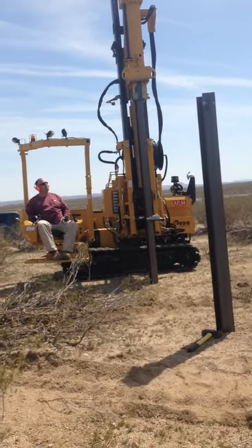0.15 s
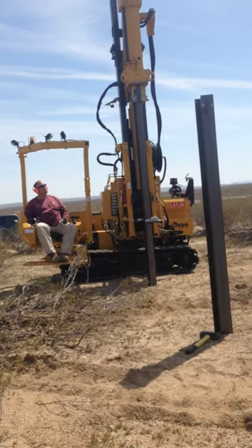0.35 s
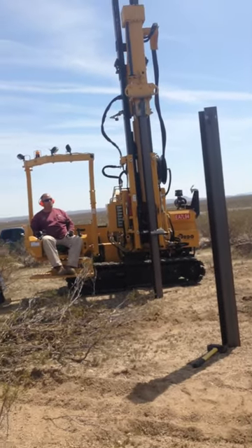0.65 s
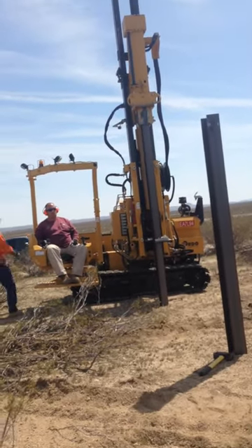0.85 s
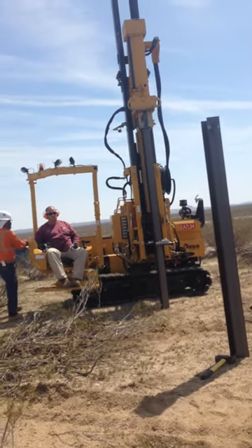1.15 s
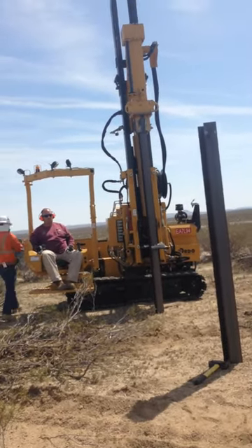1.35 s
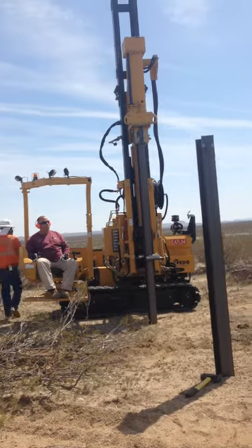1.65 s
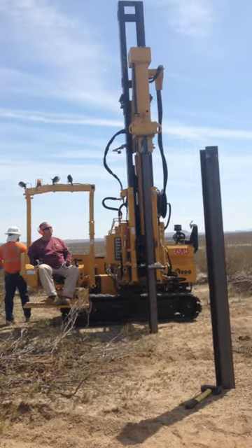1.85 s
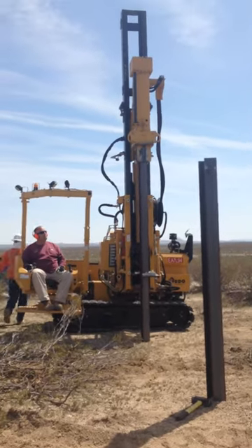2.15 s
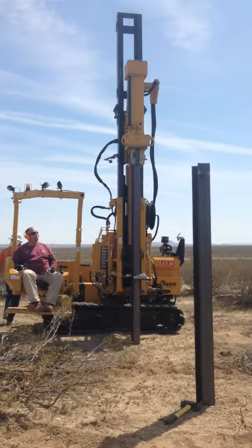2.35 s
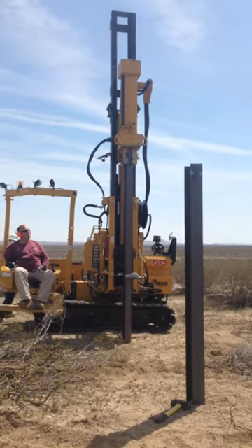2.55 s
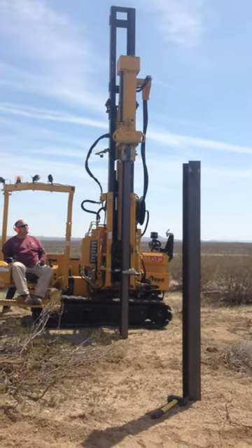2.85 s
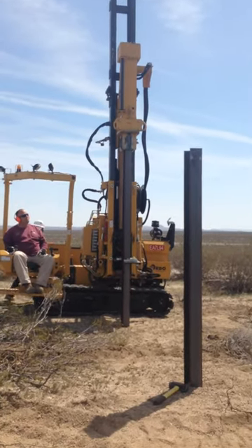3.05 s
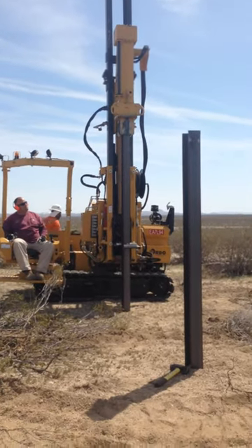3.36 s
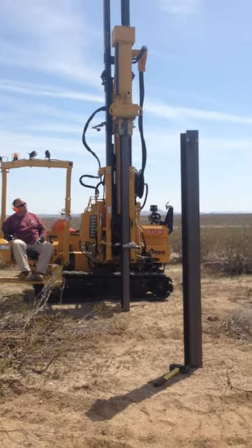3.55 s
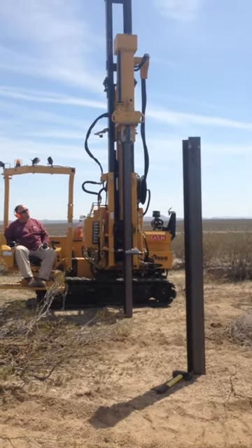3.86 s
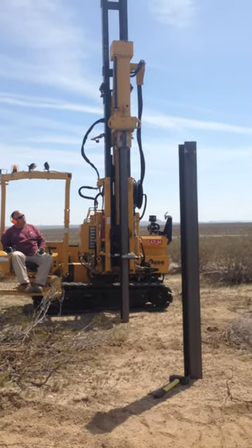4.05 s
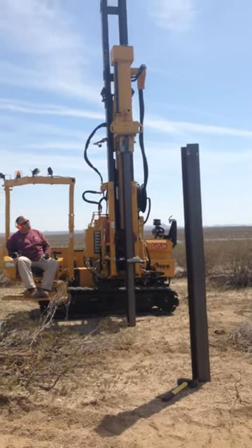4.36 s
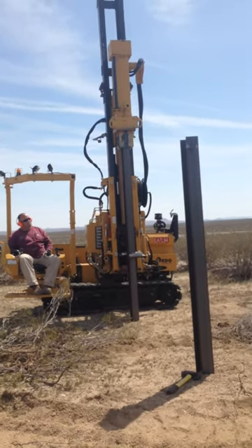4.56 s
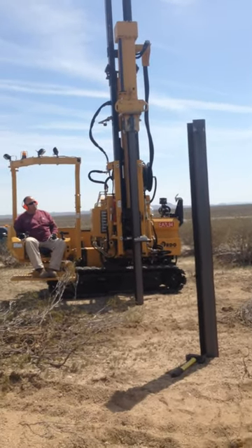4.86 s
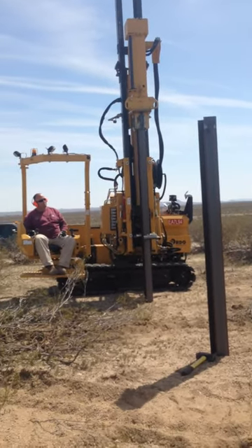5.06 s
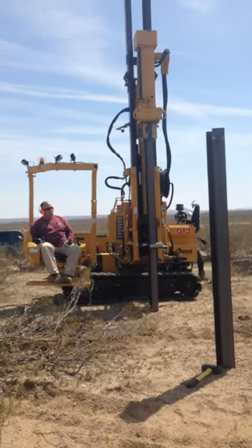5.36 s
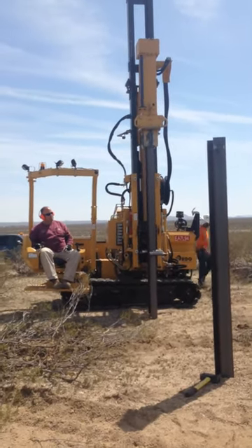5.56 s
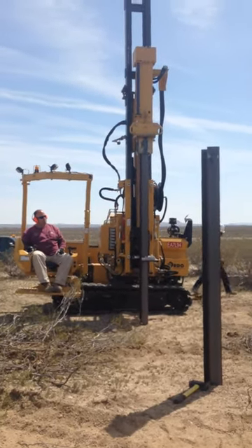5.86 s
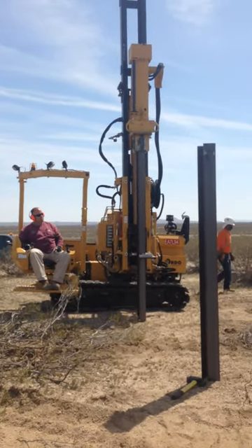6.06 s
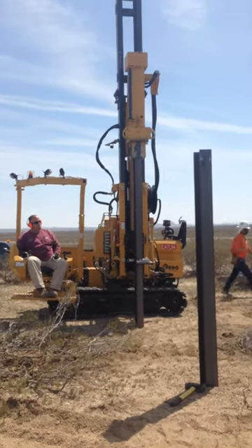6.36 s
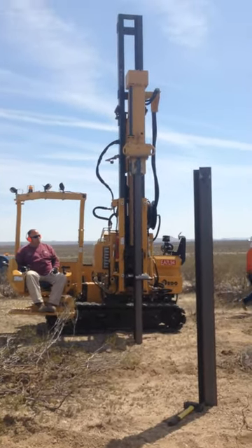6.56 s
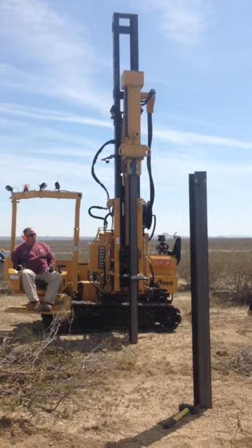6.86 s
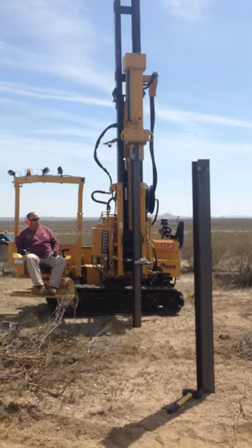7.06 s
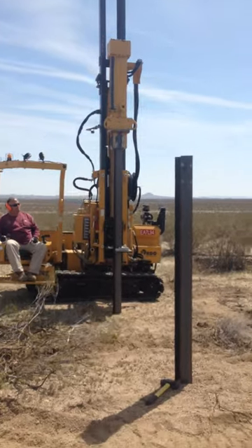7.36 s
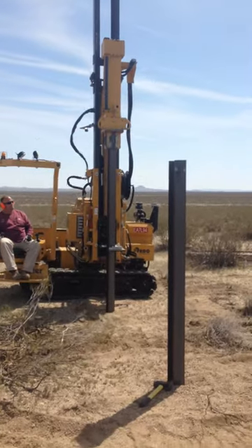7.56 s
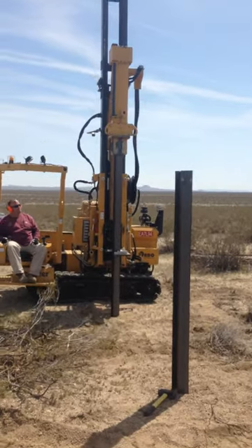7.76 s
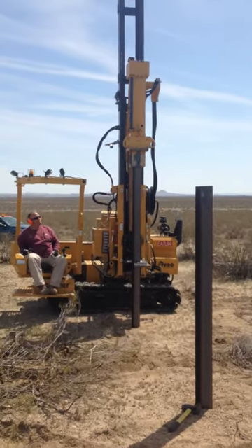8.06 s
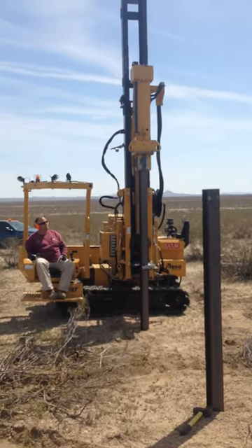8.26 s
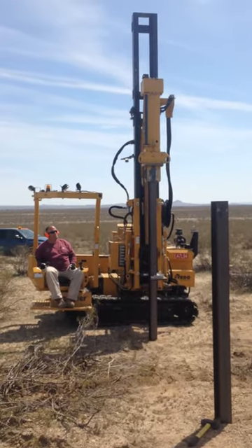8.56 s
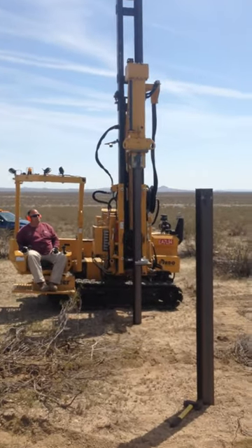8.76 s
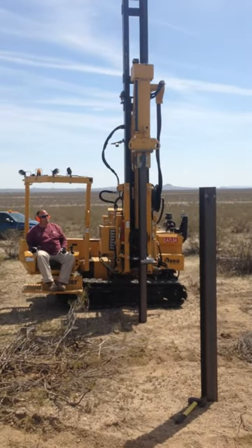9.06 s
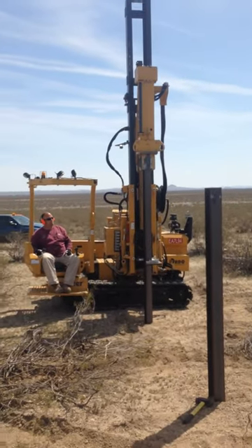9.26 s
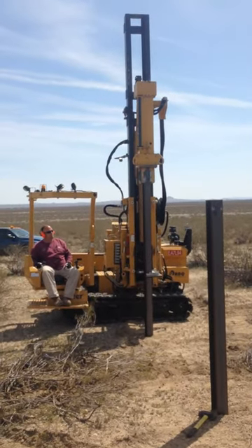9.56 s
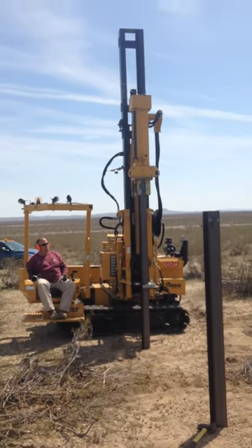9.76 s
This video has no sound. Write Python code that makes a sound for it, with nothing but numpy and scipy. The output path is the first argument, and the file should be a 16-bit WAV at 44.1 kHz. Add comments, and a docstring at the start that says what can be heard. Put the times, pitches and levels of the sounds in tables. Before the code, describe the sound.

Already running at 0 s, a hydraulic hammer pounds a steel pile at roughly sixteen blows a second, unbroken to the end near 10 s. Each blow is a short dense clank with a quick rebound rattle and thin high overtones. A piercing ring near 2.8 kHz never stops, swelling between blows and wavering. Below, a diesel hums and rushes, rising with the hammering. Faint sharp ticks occur around 0.4-0.6 s, and the ring is abruptly checked several times from 0.7 to 1.7 s. From about 2 to 4.5 s the clank is stronger; further checks follow from 4 s, and blows ease towards 6.5 s. Around 7.1-7.9 s the pile meets firmer ground: its knock changes pitch, the treble dulls, and the mast clonks irregularly until 9.5 s. The ring weakens near 9 s, with one faint tick at 9.2 s, then returns. Close, dry, open-air sound with limited peaks.

```python
"""Open ground, dry, microphone a few metres from a hydraulic hammer driving a steel pile, some sixteen blows a second.
From the start a diesel hums and rushes below, each blow clanks in dense modes, and a flange sings near 2.8 kHz.
Small ticks and checked rings mark the first two seconds; more checks follow from four seconds on.
Past seven seconds the foot breaks into firm ground: the pile's modes change, the treble dulls and jolts clonk
the mast, with one late tick near nine seconds. A limiter ducks the peaks throughout."""
import sys
import numpy as np
from scipy import signal
from scipy.fft import rfft, irfft
from scipy.io import wavfile
from scipy.ndimage import uniform_filter1d, minimum_filter1d

SR = 44100
rng = np.random.default_rng(int(sys.argv[2]) if len(sys.argv) > 2 else 0)


def int16_out(signal):
    """Quantize to a 16-bit WAV file."""
    q = np.round(np.clip(np.atleast_2d(signal).T, -1, 1) * 32767)
    wavfile.write(sys.argv[1], SR, q.astype(np.int16))


N = 436581
TIME = np.arange(N) / SR
AGE = np.arange(8192) / SR  # seconds since a blow

# How hard the hammer strikes. Each row: time in seconds, relative clank level in dB.
FORCE = [(0.0, -29.5), (1.4, -28.0), (2.1, -24), (2.3, -26.5), (2.6, -21), (2.8, -26.5), (3.6, -23.5),
         (3.9, -26), (4.3, -23.5), (4.5, -24.5), (6.5, -28.5), (8.3, -22), (8.9, -25), (9.9, -24.5)]


def amp(db):
    """Decibels to gain."""
    return 10 ** (np.asarray(db) / 20)


def evened(x):
    """Scales each row to rms 1."""
    return x / np.sqrt(np.mean(x ** 2, axis=-1, keepdims=True) + 1e-20)


def colour(points, hz):
    """Reads a spectrum in dB on a log-frequency axis."""
    f, db = np.transpose(points)
    return np.interp(np.log(hz + 1), np.log(f), db)


def curve(rows, t):
    """Reads every column of a time table at the times t."""
    s, *columns = np.transpose(rows)
    return [np.interp(t, s, c) for c in columns]


def wander(top_hz):
    """Slow random movement of rms 1, fading out above top_hz."""
    hz = np.fft.rfftfreq(N, 1 / SR)
    return evened(irfft(rfft(rng.standard_normal(N)) * np.exp(-(hz / top_hz) ** 2), N))


def strike(s, sounds, db):
    """Places one sound at each blow; db is its rms over one hammer cycle."""
    cycle = np.mean(np.diff(s))
    levelled = evened(sounds) * amp(db)[:, None] * np.sqrt(cycle / AGE[-1])
    out = np.zeros(N + 2 * len(AGE))
    for start, sound in zip(s, levelled):
        out[max(round(start * SR), 0):][:len(AGE)] += sound
    return out[:N]


def alike(count, size, memory):
    """Random rows, one a blow, each keeping a share (memory, 0-1) of the one before."""
    rows = rng.standard_normal((count, size))
    for k in range(1, count):
        rows[k] = memory * rows[k - 1] + np.sqrt(1 - memory ** 2) * rows[k]
    return rows


def causal(db):
    """Minimum-phase responses for rows of gains in dB."""
    log_gain = np.log(amp(np.concatenate([db, db[:, -2:0:-1]], axis=1)))
    return np.exp(signal.hilbert(log_gain, axis=1).conj())[:, :db.shape[1]]


def modes(s, table, db, rise, slip, memory):
    """Dying steel modes, rising in rise seconds; strength and phase (slip, radians) drift from blow to blow."""
    sounds = np.zeros((len(db), len(AGE)))
    for hz, mode_db, t60 in table:
        size, phase = alike(len(db), 2, memory).T[:, :, None]
        turn = np.exp(2j * np.pi * hz * AGE - np.log(1000) * AGE / t60)
        sounds += (amp(mode_db + 2 * size) * np.exp(1j * slip * phase) * turn).imag
    return strike(s, sounds * (1 - np.exp(-(AGE / rise) ** 2)), db)


def diesel(level_db=-42.0, load_follow=0.93, surge_db=2.3, rush_db=-35, follow=1.0, waver=.002, rough=0.17):
    """Engine orders on a slightly wavering shaft, in a noisy rush; louder when the hammer works harder."""
    # Engine orders. Each row: multiple of the working cycle, relative level in dB.
    orders = [(3, -22.5), (4, -11), (5, -15), (6, -0.5), (7, -19), (8, -12), (9, -16.5), (12, -13.5),
              (14, -14), (18, -15)]
    # Fan, exhaust and hydraulic rush. Each row: frequency in Hz, relative density in dB per Hz.
    rush_spectrum = [(20, -12.5), (45, -5), (100, 4), (200, -5), (400, 2.5), (800, 3), (1500, -2),
                     (2400, -1), (3400, -4.5), (4300, -25), (5600, -29), (6400, -36.5), (11000, -45.5),
                     (15500, -51.5)]
    cycle_hz = 16.88
    force_db = curve(FORCE, TIME)[0]
    db = load_follow * (force_db - force_db.mean()) + surge_db * wander(top_hz=6.8)
    turns = np.cumsum(cycle_hz * (1 + waver * wander(top_hz=1.6))) / SR
    hum = sum(amp(order_db) * np.sin(2 * np.pi * (k * turns + rng.random())) for k, order_db in orders)
    hum = evened(hum) * (1 + rough * wander(top_hz=25)) * amp(db + level_db)
    rush_gain = amp(colour(rush_spectrum, np.fft.rfftfreq(N, 1 / SR)))
    rush = evened(irfft(rfft(rng.standard_normal(N)) * rush_gain, N))
    return hum + rush * amp(rush_db + follow * db)


def ticks(level_db=3, fall=0.0014, low_hz=5000):
    """Sharp little ticks of loose steel: high-passed noise that dies within milliseconds."""
    # Each row: start in seconds, level in dB relative to level_db.
    tick_rows = [(0.435, -38), (0.4934, -40), (0.6177, -31), (9.1917, -44)]
    high_pass = signal.butter(2, low_hz, "highpass", fs=SR, output="sos")
    out = np.zeros(N + len(AGE))
    for when, db in tick_rows:
        burst = signal.sosfilt(high_pass, rng.standard_normal(len(AGE)) * np.exp(-AGE / fall))
        out[round(when * SR):][:len(AGE)] += burst * amp(db + level_db)
    return out[:N]


def blow_times():
    """The hammer strikes once in each cycle of its valve, a hair early or late."""
    # Speed of the hammer. Each row: seconds after the first blow, blows per second.
    rate = [(0.0, 16.412), (1.9, 16.596), (2.5, 16.47), (3.5, 16.487), (5.0, 16.297), (5.8, 16.093),
            (6.2, 16.389), (6.9, 16.064), (7.4, 16.154), (8.3, 16.091), (9.0, 16.23), (9.9, 16.059)]
    first_blow_s, jitter_s = .0064, .0004
    cycles = np.cumsum(curve(rate, TIME - first_blow_s)[0]) / SR
    s = first_blow_s + np.interp(np.arange(int(cycles[-1]) + 1), cycles, TIME)
    return s + jitter_s * rng.standard_normal(len(s))


def ground_firmness(s):
    """The pile passes from loose into firm ground; 0 is loose, 1 is firm."""
    # Each row: time in seconds, firmness from 0 to 1.
    firmness = [(0, 0.01), (7.1, 0.14), (7.5, 0.54), (7.9, 0.98), (9.9, 1)]
    return np.clip(curve(firmness, s)[0], .001, .999)


def foot_break(s, middle_s=7.6, half_s=0.46):
    """The pile's foot breaks into the firm layer: a hump in dB, 6 dB down half_s from its middle."""
    return -6 * np.minimum(((s - middle_s) / half_s) ** 2, 10)


def mast(s, force_db, firm, rest_db=-44.0, follow=.9, firm_db=3.0):
    """The mast's modes hum along with every blow and clonk when a blow jolts it against its guides."""
    # Modes of the mast. Each row: frequency in Hz, relative level in dB, decay time t60 in seconds.
    mast_modes = [(206, -9, 0.18), (252, -9.5, 0.042), (294.4, 0, 0.12), (611.3, -1.5, .3),
                  (805, -0.5, .25), (1005, -5, 0.051), (1044, -3, 0.23)]
    # Blows that jolt the mast. Each row: time in seconds, level in dB.
    jolts = [(7.64, -28.5), (7.83, -36), (8.39, -34.5), (8.88, -31), (9.44, -29.5), (9.5, -34)]
    db = rest_db + follow * force_db + firm_db * firm
    for when, jolt_db in jolts:
        db[np.argmin(abs(s - when))] = jolt_db
    return modes(s, mast_modes, db, rise=0.018, slip=1.98, memory=0.42)


def sizzle(s, db, centre_hz=10690, width_hz=110, rise=.001, fall=0.026):
    """A thin, high cluster of steel modes, made of narrow-band noise, lingers after each blow."""
    hz = np.fft.rfftfreq(len(AGE), 1 / SR)
    noise = rfft(rng.standard_normal((len(db), len(AGE))))
    cluster = irfft(noise / (1 + ((hz - centre_hz) / width_hz) ** 2))
    return strike(s, cluster * (1 - np.exp(-AGE / rise)) * np.exp(-AGE / fall), db)


def overtones(s, force_db):
    """Thin high overtones of the steel, which grow faster than the force of the blow."""
    # Each row: frequency in Hz, relative level in dB, decay time t60 in seconds.
    high_modes = [(3503, 0, .25), (4072, -10, .17), (4640, -23, .15), (4900, -21, .15), (5210, -22, .15),
                  (5541, -20, .3), (5800, -23, .18), (6358, -34, .2), (8010, -36, .25), (8522, -36, .2),
                  (9604, -36, .2)]
    return modes(s, high_modes, -42.0 + 1.3 * force_db, rise=0.0049, slip=1.9, memory=0.88)


def web_ring(s, web_db, force_db, firm, breaking_db):
    """Modes of the pile's web; firm ground brings out the low ones far more than the middle ones."""
    # Both tables, each row: frequency in Hz, relative level in dB, decay time t60 in seconds.
    low_modes = [(1628, -15.5, 0.057), (1705, -7, 0.048), (1754.4, -2.5, 0.068), (1790, 0, 0.021)]
    mid_modes = [(2278, -7, 0.29), (2310, -2.5, .11), (2348, 4.5, 0.066)]
    low_db = web_db - 2.4 + 0.51 * force_db + 8.5 * firm + 2.5 * amp(breaking_db)
    low = modes(s, low_modes, low_db, rise=0.0024, slip=1.0, memory=0.74)
    mid = modes(s, mid_modes, web_db - .6 + 0.5 * firm, rise=0.0019, slip=.9, memory=0.48)
    return low + mid


def knock(s, clank_db, firm):
    """Bending modes of the pile: those of loose ground give way to those of firm ground, which holds its foot."""
    # Both tables, each row: frequency in Hz, relative level in dB, decay time t60 in seconds.
    loose_modes = [(311.8, -14.5, 0.21), (341.4, -9.5, 0.08), (427.8, 4, 0.08), (551.8, -2.5, 0.095),
                   (609.3, -9, 0.12), (817, 0, .07)]
    firm_modes = [(313.2, -5.5, 0.13), (390, -11, 0.068), (536.3, -2, .06), (648.4, 1, 0.064),
                  (688.6, 2, 0.054), (895, -4.5, 0.058), (1119.5, -11.5, 0.24)]
    loose_db = clank_db - 4.5 + 10 * np.log10(1 - firm)
    firm_db = clank_db - 4.5 + 10 * np.log10(firm)
    loose = modes(s, loose_modes, loose_db, rise=.0025, slip=1.43, memory=0.909)
    return loose + modes(s, firm_modes, firm_db, rise=0.0017, slip=0.78, memory=.85)


def zing(s, zing_db, web_db, breaking_db, return_s=.0085):
    """The flange flares at each blow, and again when the bending wave comes back from the pile's foot."""
    # Close modes just above the flange's steady ring, then its swell as the foot breaks through.
    # Both tables, each row: frequency in Hz, relative level in dB, decay time t60 in seconds.
    flange_modes = [(2796, -4.5, 0.11), (2822, 0.5, 0.059), (2850, -1, 0.074), (2860, -2.5, 0.046),
                    (2911, 0, 0.052), (2940, -10.5, 0.075)]
    swell_modes = [(2783, 0, .07)]
    first = modes(s, flange_modes, zing_db + 1.13, rise=0.0033, slip=0.7, memory=.85)
    # what comes back follows the ringing of the web
    echo = modes(s, flange_modes, web_db - .3, rise=0.0084, slip=0.97, memory=.7)
    echo += modes(s, swell_modes, breaking_db - 16.5, rise=0.009, slip=0.67, memory=0.74)
    return first + np.interp(TIME - return_s, TIME, echo, left=0)


def ring_level(s, scatter_db=2):
    """The flange's ring after each blow: a slow curve with scatter, checked by blows against its swing."""
    # Sustained ring. Each row: time in seconds, relative level in dB.
    ring = [(0, -25.5), (.9, -19), (1.6, -19.5), (2.6, -15.5), (3, -17.5), (5.8, -18), (6, -22), (7.2, -21),
            (7.9, -17.5), (8.1, -24.5), (9.1, -29), (9.9, -17.5)]
    # Blows that check it. Each row: time in seconds, change in dB.
    checks = [(.74, -12), (1.04, -10), (1.16, -9), (1.22, -14), (1.4, -16), (1.7, -12), (4.19, -4.5),
              (4.56, -3.5), (5.42, -6), (5.97, -12), (6.16, -10), (6.52, -7), (6.83, -8.5), (7.58, -11)]
    db = curve(ring, s)[0] + scatter_db * rng.standard_normal(len(s))
    for when, change_db in checks:
        db[np.argmin(abs(s - when))] += change_db
    return db


def flange(s, db, ring_hz=2775, kick=0.301, level_db=3.5, beat_hz=2793, beat_db=-9, flutter=0.051, crest=.68):
    """The flange never stops singing: each blow feeds or checks it and jolts its phase (kick, turns)."""
    knots = np.column_stack([s, s + .018]).ravel()

    def held(values):
        """Moves to each blow's value within 18 ms of the blow, then stays there."""
        return np.interp(TIME, knots, np.r_[values[0], np.repeat(values, 2)[:-1]])

    jolt, beat_jolt = np.cumsum(kick * rng.standard_normal((len(s), 2)), axis=0).T
    tone = np.sin(2 * np.pi * (ring_hz * TIME + held(jolt)))
    tone += amp(beat_db) * np.sin(2 * np.pi * (beat_hz * TIME + held(beat_jolt)))
    # the slowest waves come back late, so the ring swells between two blows
    cycle = np.interp(TIME, s, np.arange(len(s)))
    arch = .7 + .3 * np.cos(2 * np.pi * (cycle - crest))
    return evened(tone) * arch * held(amp(db + level_db)) * (1 + flutter * wander(top_hz=90))


def clank(s, db, firm, level_db=-2, rise=0.0011, fall=0.015, tail_db=-12, tail_fall=0.056,
          rebound_s=0.0087, rebound_db=-6, rebound_fall=0.006,
          fresh_hz=1500, patchy_db=4.0, dull_db=-4.5, dull_hz=6000):
    """Dense modes of pile and mast, struck, then hit by the rebound: the bass repeats, the treble rattles anew."""
    # Dense wash of the clank. Each row: frequency in Hz, relative level in dB.
    body = [(40, -21.5), (150, -10), (260, -13), (400, -3), (720, -7.5), (1000, -1), (1450, -2.5),
            (2050, 2.5), (2550, -6.5), (3300, -6), (3800, -12), (5700, -23.5), (6300, -32.5), (9300, -37),
            (11000, -31.5), (13500, -48.5), (15800, -53)]
    hz = np.fft.rfftfreq(len(AGE), 1 / SR)
    late, size = rng.standard_normal((len(s), 2)).T[:, :, None]
    again = np.maximum(AGE - rebound_s * (1 + 0.32 * late), 0)  # seconds since the rebound
    decay = np.exp(-AGE / fall) + amp(tail_db) * np.exp(-AGE / tail_fall)
    shape = (1 - np.exp(-(AGE / rise) ** 2)) * decay
    rebound = (1 - np.exp(-(again / rise) ** 2)) * np.exp(-again / rebound_fall)
    shape = shape + amp(rebound_db + 2 * size) * rebound
    steady = rfft(alike(len(s), len(AGE), memory=.93) * shape)
    fresh = rfft(rng.standard_normal((len(s), len(AGE))) * shape)
    treble = hz / (hz + fresh_hz)
    share = .5 * treble  # power share of the fresh noise
    wash = np.sqrt(1 - share) * steady + np.sqrt(share) * fresh
    # the anvil never seats twice in the same way, so the treble's colour varies
    patches = evened(uniform_filter1d(rng.standard_normal(fresh.shape), size=250, axis=1))
    body_db = colour(body, hz) + patchy_db * patches * treble
    # firm ground dulls the blow
    body_db = body_db + dull_db * firm[:, None] * hz ** 2 / (hz ** 2 + dull_hz ** 2)
    return strike(s, irfft(wash * causal(body_db)), db + level_db)


def scene():
    """Engine, mast, pile and hammer, heard from a few metres away."""
    # Ringing of the pile's web. Each row: time in seconds, relative level in dB.
    web_level = [(0.0, -28.5), (2.2, -25.0), (2.8, -27.0), (4.9, -28), (5.1, -30.5), (6.3, -36.5),
                 (7.4, -27), (8.6, -31), (9.9, -33)]
    # The flange's short zing at each blow. Each row: time in seconds, relative level in dB.
    zing_level = [(0.0, -19), (1.5, -20.5), (1.7, -24), (3.0, -20.5), (3.5, -22.5), (6.1, -17.5),
                  (7.1, -21), (8.2, -27), (8.6, -23.0), (9.9, -21.5)]
    s = blow_times()
    # chance differences from blow to blow, in dB
    harder_db, brighter_db = rng.standard_normal((len(s), 2)).T * np.array([[1.16], [0.63]])
    clank_db = curve(FORCE, s)[0] + harder_db
    web_db = curve(web_level, s)[0] + harder_db
    zing_db = curve(zing_level, s)[0] + brighter_db
    force_db = clank_db - clank_db.mean()
    firm = ground_firmness(s)
    breaking_db = foot_break(s)
    background = diesel() + ticks() + mast(s, force_db, firm)
    high = overtones(s, force_db) + sizzle(s, -58.5 + 0.88 * force_db + 1.5 * firm)
    ringing = web_ring(s, web_db, force_db, firm, breaking_db) + knock(s, clank_db, firm)
    singing = zing(s, zing_db, web_db, breaking_db) + flange(s, ring_level(s))
    blows = clank(s, clank_db - 1.1 * firm, firm)
    return (background + high + ringing + singing + blows)[None]


def record(dry, ceiling_db=-2.5, release_db=170, edge_hz=15800):
    """A look-ahead limiter ducks peaks above the ceiling, recovering at release_db per second; then a low-pass."""
    over_db = np.maximum(20 * np.log10(abs(dry[0]) + 1e-9) - ceiling_db, 0)
    ahead_db = -minimum_filter1d(-over_db, size=161)
    recovery = TIME * release_db
    duck_db = uniform_filter1d(np.maximum.accumulate(ahead_db + recovery) - recovery, size=161)
    low_pass = signal.firwin(511, edge_hz, window=("kaiser", 9), fs=SR)
    return signal.oaconvolve(dry * amp(-duck_db), low_pass[None], "same")


dry = scene()
out = record(dry)
int16_out(out)
```